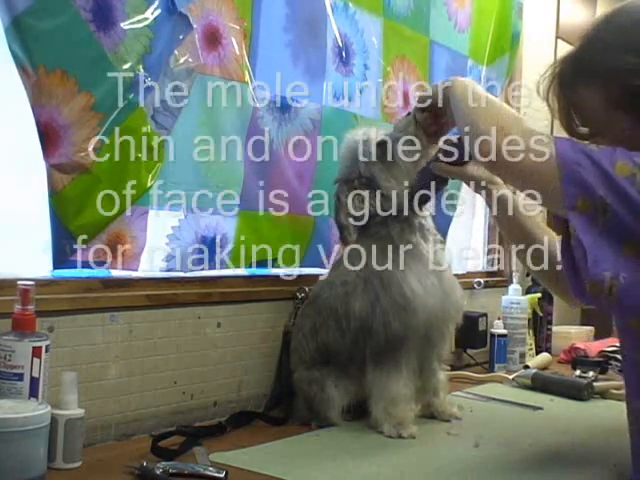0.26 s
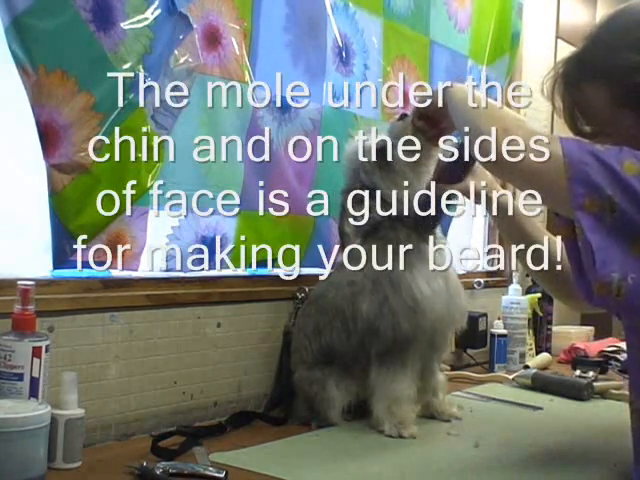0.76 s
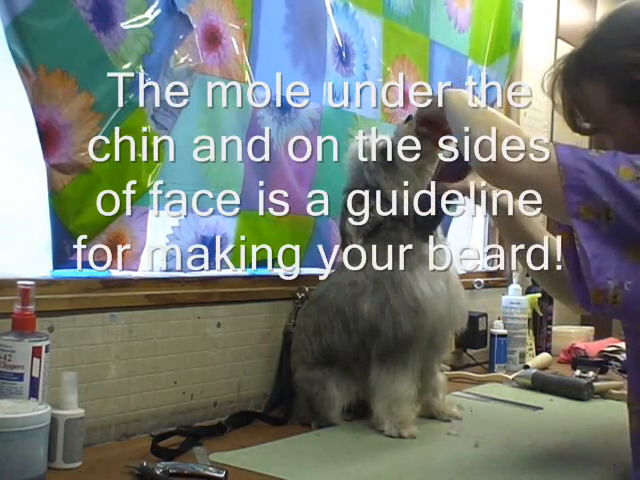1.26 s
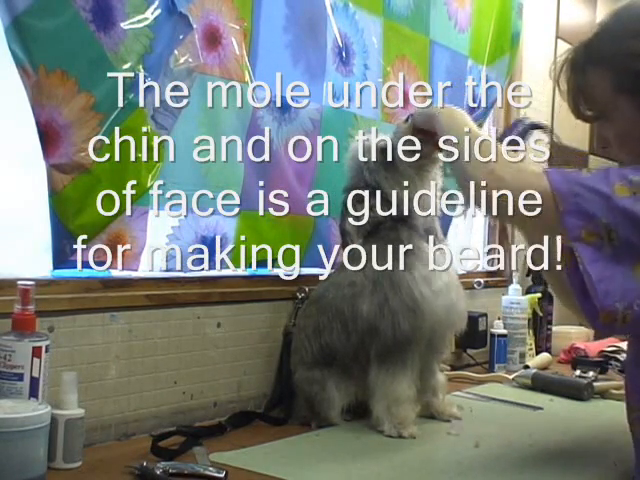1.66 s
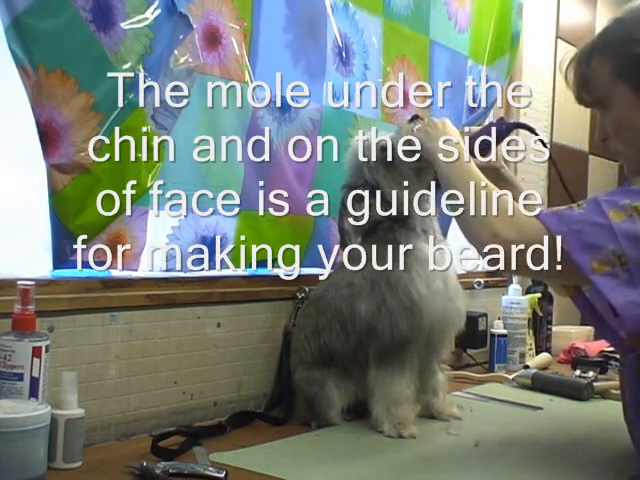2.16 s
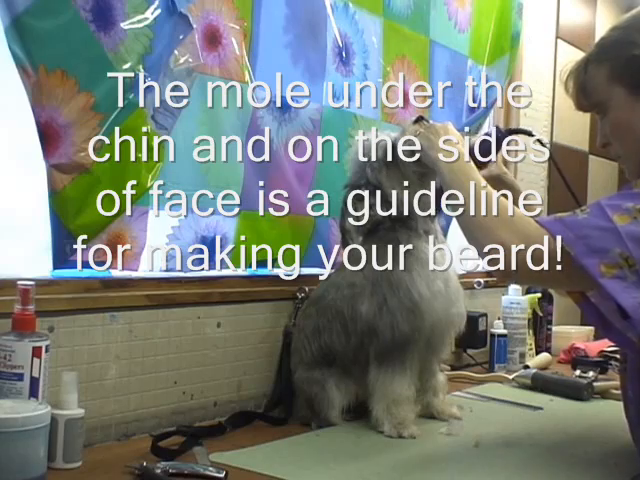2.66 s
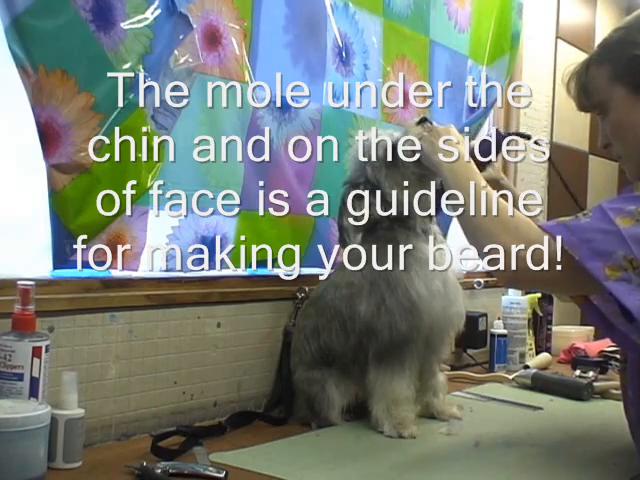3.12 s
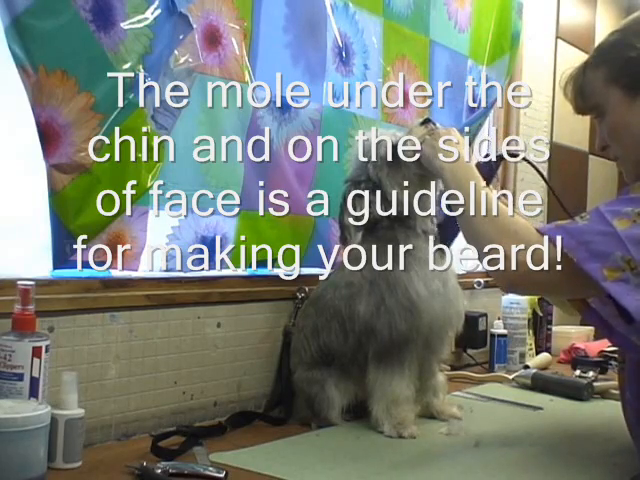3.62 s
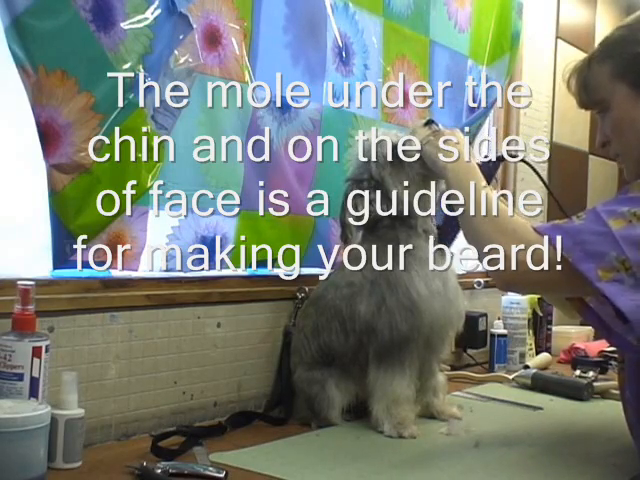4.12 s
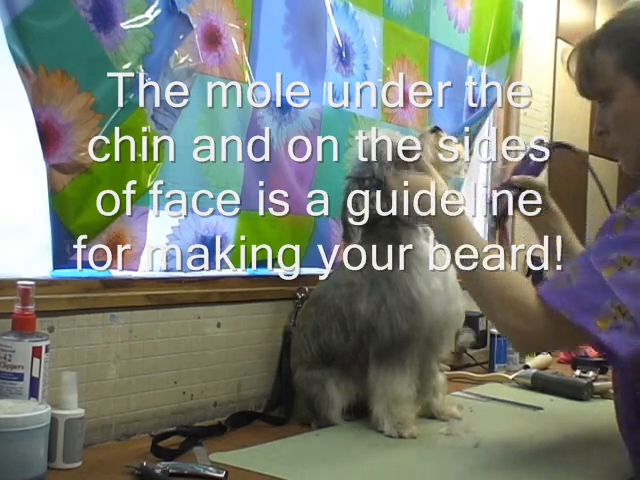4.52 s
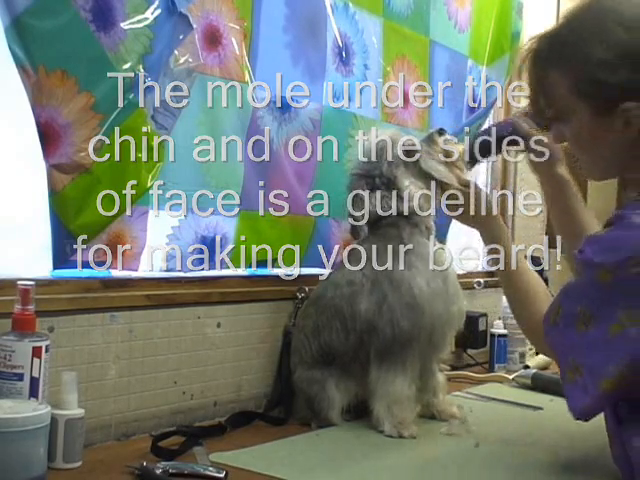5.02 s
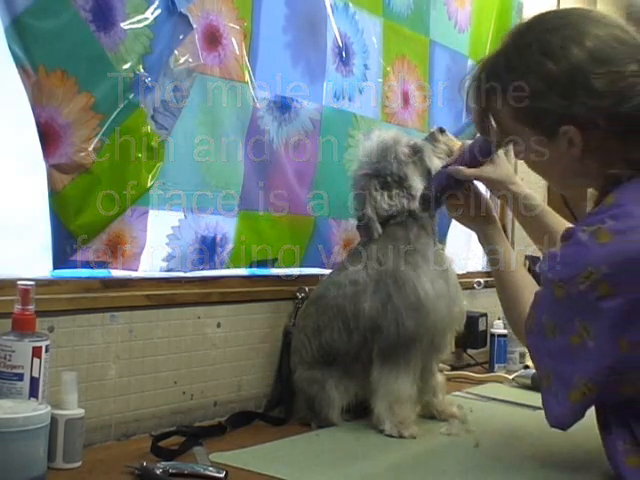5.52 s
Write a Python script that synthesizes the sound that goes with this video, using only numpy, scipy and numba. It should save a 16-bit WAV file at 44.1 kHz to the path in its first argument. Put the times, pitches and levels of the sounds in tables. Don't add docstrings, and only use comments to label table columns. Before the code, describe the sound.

A nonstop, dense clipper buzz fills the whole stretch, raspy and metallic, with fine blade rattle and airy hiss. The tone colour keeps shifting with the hand, and a high motor whine comes and goes. Three faint low grumbles pass between about three and four seconds. Quiet ventilation rumbles behind. Small reflective indoor room, close right-leaning stereo pickup with dulled extreme treble.

```python
import sys
import numpy as np
from scipy import signal
from scipy.fft import rfft, irfft
from scipy.io import wavfile
from scipy.ndimage import uniform_filter1d
from numba import njit

SR = 44100
rng = np.random.default_rng(int(sys.argv[2]) if len(sys.argv) > 2 else 0)


def inscribe(sig):
    pcm = np.round(np.clip(np.atleast_2d(sig).T, -1, 1) * 32767)
    wavfile.write(sys.argv[1], SR, pcm.astype(np.int16))


def volts(x):
    e = np.asarray(x, float) / 20
    return 10 ** e


N = 254898
STEP_SAMPLES = 256
HZ = np.maximum(np.arange(N // 2 + 1) * SR / N, 1)

# (time [s], speed [turns/s], blade facing [dB], grip opening [dB])
MOTOR = [(0.0, 75.4, -30.5, -34), (0.06, 75.6, -30, -35), (0.48, 75.4, -28, -37), (1.78, 75.3, -29, -36),
         (2.0, 75.5, -34, -34), (2.12, 75.5, -33.5, -37.5), (2.16, 75.5, -32.5, -37),
         (2.62, 75.6, -36, -35.5), (3.15, 75.5, -30.5, -37.5), (3.17, 75.5, -32.5, -36),
         (3.38, 75.7, -35.5, -37.5), (3.93, 75.6, -31, -38), (4.15, 75.6, -33.5, -37),
         (4.65, 75.7, -31, -37), (5.01, 75.6, -31.5, -31), (5.12, 75.7, -32.5, -31.5),
         (5.6, 75.6, -31, -34), (5.78, 75.3, -29, -35)]
PART_EDGES_HZ = (1000, 1620, 2450)
# (multiple of turning rate, level [dB])
KNOCK = [(1, -21.5), (2, -42), (3, -26.5), (4, -35.5), (5, -24), (6, -24.5), (7, -18.5), (8, -21), (9, -22),
         (10, -15), (11, -20), (12, -14.5), (13, -22.5), (14, -20), (15, -17.5), (16, -16), (17, -25),
         (18, -10.5), (19, -17.5), (20, -10.5), (21, -16.5), (22, -15.0), (23, -15.5), (24, -19.5),
         (25, -7.5), (26, -11), (27, -6), (28, -7.5), (29, -14.5), (30, -21)]
# (frequency [Hz], level [dB])
TEETH = [(2340, -18.5), (2500, -17), (3200, -18.5), (4300, -18), (5300, -22), (6000, -22), (7000, -31.5),
         (9000, -41)]
# (multiple, lift [dB])
PROUD = [(35, 4.5), (36, 5.5), (39, 4.5), (40, -9), (48, 5), (53, 6), (59, 4), (67, 4)]
# (time [s], half length [s], multiple, lift [dB])
POSES = [(0.0, 0.36, 32, 11), (0.07, 0.13, 28, -7.5), (0.7, 0.33, 29, -15), (0.84, 1.3, 23, 7),
         (0.91, 0.7, 22, 5), (0.98, 0.96, 17, 11), (1.4, 0.19, 15, -12), (1.4, 0.31, 31, 5.5),
         (1.47, 0.33, 24, 10), (2.03, 0.14, 20, -10), (2.1, 0.89, 14, 5), (2.59, 2.7, 15, 3.5),
         (2.66, 1.2, 19, 4), (2.73, 0.65, 23, 9.5), (2.73, 0.71, 25, 3.0), (2.73, 0.56, 26, -17),
         (2.94, 1, 30, 6), (3.78, 1.3, 31, 8), (3.92, 0.084, 25, 6.5), (3.92, 0.63, 25, -7),
         (4.06, 1.08, 14, 13.5), (4.13, 1.5, 18, -2.5), (4.2, 0.9, 21, -5.0), (4.41, 1.3, 29, 12),
         (4.62, 0.2, 25, 2.5), (4.69, 0.12, 29, -15), (4.9, 0.34, 20, -12), (4.97, 0.26, 28, -15),
         (5.11, 0.9, 15, 11.0), (5.74, 0.25, 23, 13)]
# (time [s], half length [s], multiple, lift [dB])
SIDE_POSES = [(0.7, 1.07, 12, 3.5), (0.77, 1.2, 9, 2.5), (0.77, 1.3, 35, -14), (0.84, 0.74, 11, -13),
              (1.19, 0.18, 37, 7.5), (1.4, 0.86, 13, 4.5), (1.4, 1.2, 55, 8), (2.03, 0.2, 9, -4),
              (2.17, 1.3, 65, 4.5), (2.52, 0.7, 40, 13.5), (2.59, 0.81, 51, 9), (2.66, 0.82, 10, -3.5),
              (2.66, 0.62, 34, 9.5), (2.66, 0.57, 53, 3.5), (3.22, 1.2, 48, -6), (3.29, 1.4, 36, -5.0),
              (3.5, 1.3, 5, 4), (3.57, 1.1, 7, -7), (3.64, 0.2, 67, 8.5), (3.71, 0.34, 12, 4.5),
              (3.78, 0.13, 34, 7.5), (3.85, 0.33, 13, 0), (4.48, 0.73, 40, 6.0), (4.83, 0.42, 9, -3),
              (4.9, 0.4, 8, 9), (4.97, 0.95, 56, 3.5), (5.25, 1.2, 45, 3), (5.32, 1, 51, -8),
              (5.53, 0.29, 12, 7.5), (5.53, 0.26, 10, -4.0)]
# (time [s], level [dB])
WHINE = [(0.0, -40), (0.04, -40), (0.14, -29.5), (0.59, -26), (1.13, -35.5), (1.22, -28), (1.72, -44),
         (2.19, -34.5), (2.53, -40), (3.11, -32), (3.5, -53), (3.73, -34), (4.01, -34), (4.1, -52),
         (4.68, -28.5), (5.0, -32.5), (5.2, -58), (5.78, -30)]
LINE_SHARE_DB = (0.42, -0.2, -2, -1.14)
# (frequency [Hz], density [dB/Hz])
RATTLE = [(340, -22.5), (700, -15.5), (1000, -12), (1500, -10), (1850, -2), (2080, 5), (2250, -1.5),
          (2500, -4.5), (3200, -3), (4100, -0.5), (5200, -0.5), (6500, -13.5)]
RATTLE_SHARE_DB = (-15.5, -15, -11, -7.5)
# (frequency [Hz], density [dB/Hz])
HISS_COLOUR = [(5200, -5), (6000, -1.5), (6940, -1), (10000, -1.5), (11250, -2.5), (11400, 0.5),
               (14700, -2.5), (15300, -3.5), (15740, -7)]
# (start [s], length [s], rate [pulses/s], level [dB])
GRUMBLE = [
    (3.17, 0.23, 60.5, -49.5),
    (3.578, .26, 59, -51.5),
    (4.05, .13, 55, -49),
]
# (frequency [Hz], density [dB/Hz])
RUMBLE_COLOUR = [(15, -8), (45, -5), (90, -1), (140, -5.5), (200, -4.5), (330, -3.5), (500, -6),
                 (900, -21.5)]
# (frequency [Hz], level [dB])
HUM = [(120, -68), (137, -62), (480, -61.5), (960, -58), (11936, -57)]
# (frequency [Hz], left minus right [dB])
LEFT_DB = [(60, -10.5), (140, -13.5), (330, -8), (770, -9), (1790, -7), (2740, -7), (4190, -7), (6410, -4),
           (8000, -2.5), (10500, -2), (15000, -2.5)]
# (frequency [Hz], likeness [0-1])
LIKENESS = [(60, 0.39), (150, 0.5), (380, 0.62), (950, 0.17), (2380, 0.5), (5980, 0.34), (15000, 0.18)]
# (frequency [Hz], lead of left [rad])
LEAD = [(0, 0.5), (340, 0.82), (600, 0.55), (1210, 1.1), (1890, 0.82), (3360, 0.8), (3700, 1.7),
        (3960, 1.1), (5080, 0.95), (7580, 0.84), (10600, -0.2), (12000, 0), (15400, 2.5), (15800, 5.4)]
# (from [Hz], to [Hz], level [dB], share of time kept [0-1])
LEFT_TOP = [(11380, 11720, -8, .2), (11720, 12350, -14, .06), (12350, 12900, -14, .75),
            (12900, 15170, -14, 1), (15170, 15800, -14, .02)]
RIGHT_TOP = [(15250, 15520, 0, .95), (15520, 15720, 0, .7), (15720, 17000, -25, 0)]

# (mean [dB], share of facing swing, share of grip swing)
CASE, LEVER, RING = (-40.5, 0.067, -0.15), (-36, .01, .99), (-30.5, .99, .01)
COMB, SLIDE = (-32, 0.13, 0.32), (-35.5, 0.19, 0.06)
TEETH_SCATTER_DB, WHINE_MULTIPLE = 2, 27
FLARE_S, FLARE_HALF_S, FLARE_DB = 5.25, 0.12, 2
HISS_EDGES_HZ, HISS_PATCHY_DB = (6000, 6900, 8100, 9600, 11400), 0.6
GRUMBLE_EDGE_S, GRUMBLE_SAG_PER_S = 0.067, 8.8
RUMBLE_DB, RUMBLE_SWAY_DB = -56, 0.3
SWELL_S, SWELL_HALF_S, SWELL_DB = 5.6, .5, 2


def clipper():
    speed_hz = in_time(MOTOR)[0]
    *part_db, hiss_db = hand()
    wobble_turns = 0.0007 * stretch(drift(27, count=1)[0])
    turn = np.exp(2j * np.pi * (np.cumsum(speed_hz) / SR + wobble_turns))
    beat = 1 + 0.014 * turn.real + 0.028 * (turn ** 3).real + 0.055 * (turn ** 4).imag
    lines = knocks(turn)
    rattle = parts(noise(RATTLE, likeness=1.0) * beat, PART_EDGES_HZ)
    out = whine(turn)
    taken = np.minimum(volts(in_time(WHINE)[0] - part_db[2] - 2.5) ** 2, .7)
    lines[2] *= np.sqrt(1 - taken)
    for p in range(4):
        line_db = part_db[p] + LINE_SHARE_DB[p]
        rattle_db = 0.57 * part_db[p] + 0.39 * part_db[p].mean() + RATTLE_SHARE_DB[p]
        out = out + volts(line_db) * mid_one(ports(lines[p]))
        out = out + volts(rattle_db) * mid_one(rattle[p])
    return out + hiss(beat, hiss_db)


def hand():
    _, facing_db, grip_db = in_time(MOTOR)
    facing_swing_db = facing_db - facing_db.mean()
    grip_swing_db = grip_db - grip_db.mean()
    return [mean_db + a * facing_swing_db + b * grip_swing_db
            for mean_db, a, b in (CASE, LEVER, RING, COMB, SLIDE)]


def knocks(turn, count=118):
    hz = np.arange(1, count + 1) * np.mean(np.array(MOTOR)[:, 1])
    log_khz = np.log10(hz / 1000)[:, None]
    teeth_db = at_hz(TEETH, hz)
    level_db = teeth_db + TEETH_SCATTER_DB * rng.standard_normal(count)
    for multiple, lift_db in PROUD:
        level_db[round(multiple) - 1] = teeth_db[round(multiple) - 1] + lift_db
    level_db[:len(KNOCK)] = np.array(KNOCK)[:, 1]
    level_db[WHINE_MULTIPLE - 1] -= 12
    level_db[:4] -= (12.6, 12, 1.3, 5.8)

    gain = paths(count, rate_hz=1.75, echo_db=-11.5 + 7.7 * log_khz, alike=0.048) * posed(POSES, count)
    gain = gain * paths(count, rate_hz=14, echo_db=-14.5 + 7.2 * log_khz, alike=0.55)

    smear = 1 - .85 * np.exp(-((hz - 2030) / 370) ** 2) - .2 * (hz < 1000)
    lag_rad = np.arctan((hz - 2040) / 150)
    phase_rad = 2 * np.pi * smear * (rng.random(count) - .5) - lag_rad
    gain = gain * (volts(level_db) * np.exp(1j * phase_rad))[:, None]
    apart = np.exp(.3j * rng.standard_normal(count))[:, None]
    gain = gain * [apart, 1 / apart]

    part = np.searchsorted(PART_EDGES_HZ, hz)
    for p in range(4):
        power = np.sum(np.abs(gain[:, part == p].mean(axis=0)) ** 2, axis=0)
        gain[:, part == p] /= np.sqrt(power)
    gain = gain * posed(SIDE_POSES, count)
    return comb(np.ascontiguousarray(gain.transpose(0, 2, 1)), turn, part, STEP_SAMPLES)


@njit
def comb(gain, turn, part, step):
    out = np.zeros((4, 2, len(turn)))
    for n in range(len(turn)):
        j, u, z = n // step, n % step / step, 1 + 0j
        for i in range(len(part)):
            z *= turn[n]
            for side in range(2):
                g = gain[side, j, i] * (1 - u) + gain[side, j + 1, i] * u
                out[part[i], side, n] += (g * z).real
    return out


def paths(count, rate_hz, echo_db, alike):
    a, b, c, d, e, f = drift(rate_hz, count=6 * count).reshape(6, count, -1)
    common = a + 1j * b
    own = np.array([c + 1j * d, e + 1j * f])
    return 1 + volts(echo_db) * (np.sqrt(alike) * common + np.sqrt(1 - alike) * own)


def posed(poses, count):
    t = np.arange(N // STEP_SAMPLES + 2) * STEP_SAMPLES / SR
    lift_db = np.zeros((count, len(t)))
    for s, half_s, multiple, level_db in poses:
        lift_db[round(multiple) - 1] += level_db * np.exp(-((t - s) / half_s) ** 4)
    return volts(lift_db)


def whine(turn):
    path = paths(1, rate_hz=2.4, echo_db=-5.5, alike=0.071)[:, 0]
    tone = np.array([(stretch(p) * turn ** WHINE_MULTIPLE).real for p in path])
    return volts(in_time(WHINE)[0] - 2) * mid_one(ports(tone))


def hiss(beat, level_db):
    patches = parts(noise(HISS_COLOUR, likeness=1.0) * beat, HISS_EDGES_HZ)
    sways = drift(2.7, count=6)
    slide = mid_one(sum(volts(HISS_PATCHY_DB * stretch(d)) * x for x, d in zip(patches, sways)))
    flare_db = FLARE_DB * np.exp(-((np.arange(N) / SR - FLARE_S) / FLARE_HALF_S) ** 2)
    flutter_db = 0.37 * stretch(drift(5, count=1)[0])
    return volts(level_db + flare_db + 0.8 + flutter_db) * slide


def grumble():
    t, tone = np.arange(N) / SR, 0
    for s, length_s, rate_hz, level_db in GRUMBLE:
        phase = 2 * np.pi * (rate_hz - .5 * GRUMBLE_SAG_PER_S * (t - s)) * (t - s)
        shape = np.clip(np.minimum(t - s, s + length_s - t) / GRUMBLE_EDGE_S + .5, 0, 1)
        pulses = .5 * np.sin(3 * phase) + np.sin(4 * phase) + .45 * np.sin(5 * phase)
        tone = tone + volts(level_db) * shape * pulses
    tone = tone * volts(2.5 * stretch(drift(13, count=1)[0]))
    return ports(np.array([tone, np.roll(tone, 30)]))


def room():
    t = np.arange(N) / SR
    tones = sum(volts(level_db - 1.5) * np.sin(2 * np.pi * hz * t) for hz, level_db in HUM)
    swell_db = SWELL_DB * np.exp(-((t - SWELL_S) / SWELL_HALF_S) ** 2)
    sway_db = RUMBLE_SWAY_DB * stretch(drift(0.49, count=1)[0])
    rumble = mid_one(noise(RUMBLE_COLOUR, likeness=0.61))
    return volts(RUMBLE_DB + 3.5 + swell_db + sway_db) * rumble + ports(np.array([tones, tones]))


def noise(colour, likeness):
    common, left, right = rfft(rng.standard_normal((3, N)))
    alike = np.clip(likeness * at_hz(LIKENESS, HZ), 0, 1)
    inside = (HZ > colour[0][0]) & (HZ < colour[-1][0])
    both = np.sqrt(alike) * common + np.sqrt(1 - alike) * np.array([left, right])
    return ports(irfft(both * inside * volts(at_hz(colour, HZ)), N))


def ports(pair):
    tilt = volts(at_hz(LEFT_DB, HZ) / 2) * np.exp(.5j * at_hz(LEAD, HZ))
    return irfft(rfft(pair) * [tilt, 1 / tilt], N)


def parts(x, edges_hz):
    spectrum, part = rfft(x), np.searchsorted(edges_hz, HZ)
    return [irfft(spectrum * (part == k), N) for k in range(len(edges_hz) + 1)]


def drift(rate_hz, count):
    r = np.exp(-2 * np.pi * rate_hz * STEP_SAMPLES / SR)
    chance = rng.standard_normal((count, N // STEP_SAMPLES + 402))
    slow = signal.lfilter([1], [1, -2 * r, r * r], chance)[:, 400:]
    return slow / slow.std(axis=1, keepdims=True)


def stretch(slow):
    return np.interp(np.arange(N) / STEP_SAMPLES, np.arange(len(slow)), slow)


def in_time(rows):
    s, *columns = np.transpose(rows)
    return [np.interp(np.arange(N) / SR, s, c) for c in columns]


def at_hz(points, hz):
    points_hz, values = np.transpose(points)
    return np.interp(np.log(hz), np.log(points_hz + 1), values)


def mid_one(x):
    return x / np.sqrt(np.mean(x.mean(axis=0) ** 2))


def starve(x, bands):
    spectrum, out = rfft(x), x.copy()
    for low_hz, high_hz, level_db, kept in bands:
        band = irfft(spectrum * (HZ >= low_hz) * (HZ < high_hz), N)
        on = np.repeat(rng.random(N // 2048 + 1) < kept, 2048)[:N]
        out += band * (volts(level_db) * uniform_filter1d(on * 1., size=700) - 1)
    return out


def scene():
    return clipper() + grumble() + room()


def top_cut(x):
    return signal.sosfilt(signal.butter(12, 16250, fs=SR, output="sos"), x)


def record(dry):
    thin = np.array([starve(dry[0], LEFT_TOP), starve(dry[1], RIGHT_TOP)])
    return top_cut(thin)


dry = scene()
out = record(dry)
inscribe(out)
```